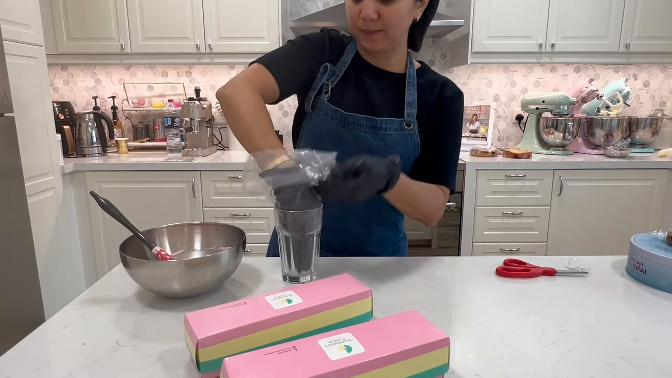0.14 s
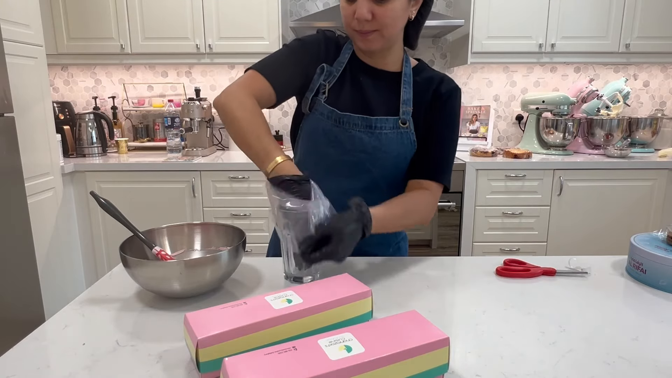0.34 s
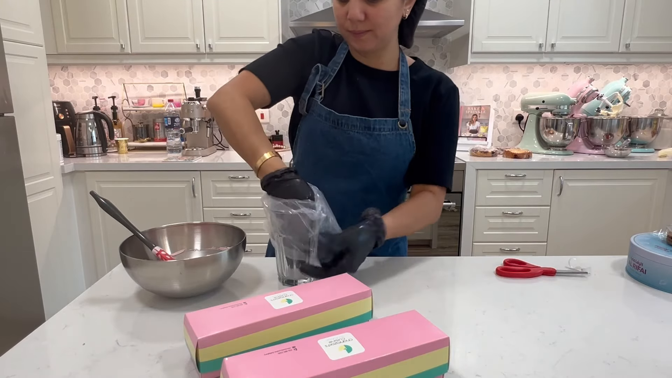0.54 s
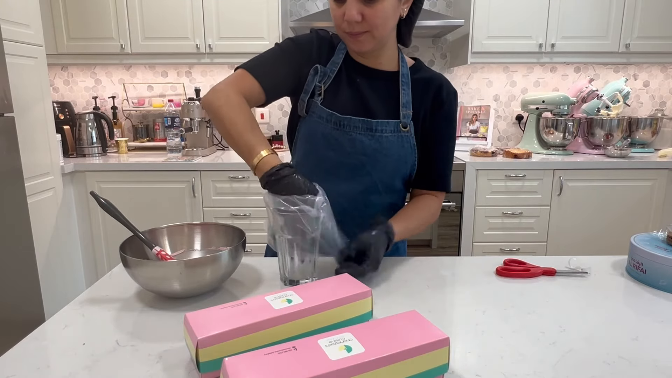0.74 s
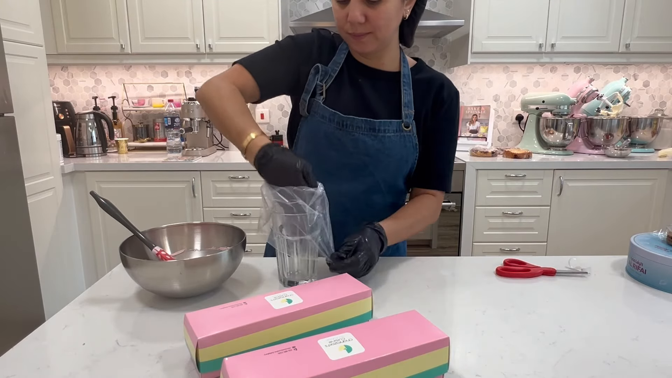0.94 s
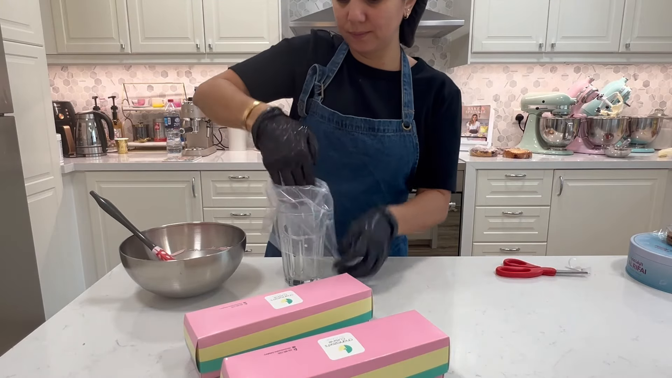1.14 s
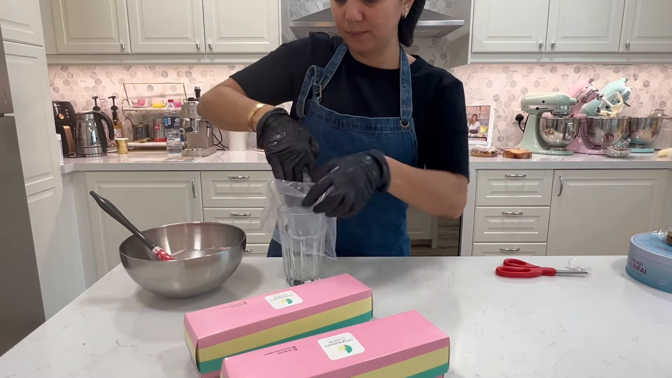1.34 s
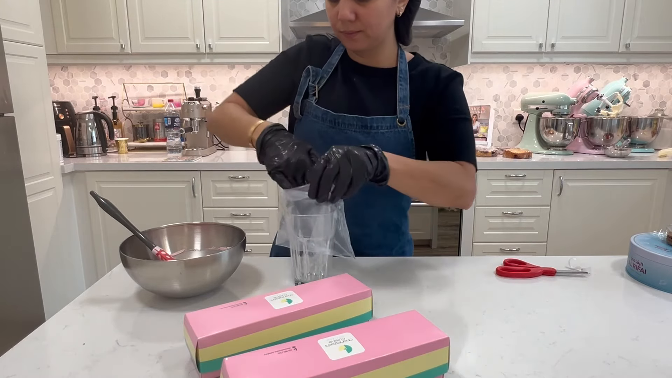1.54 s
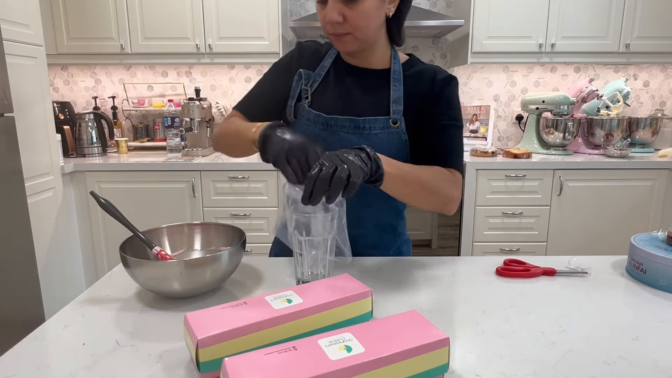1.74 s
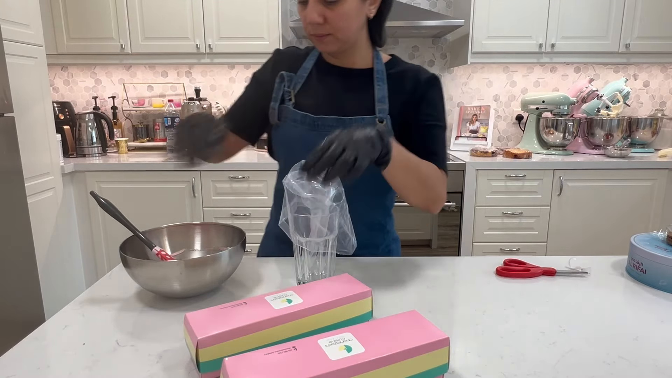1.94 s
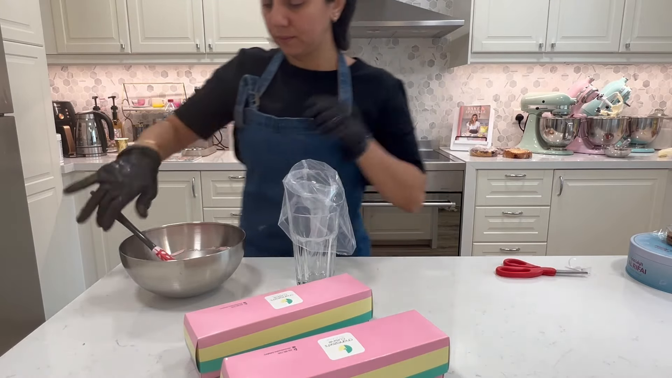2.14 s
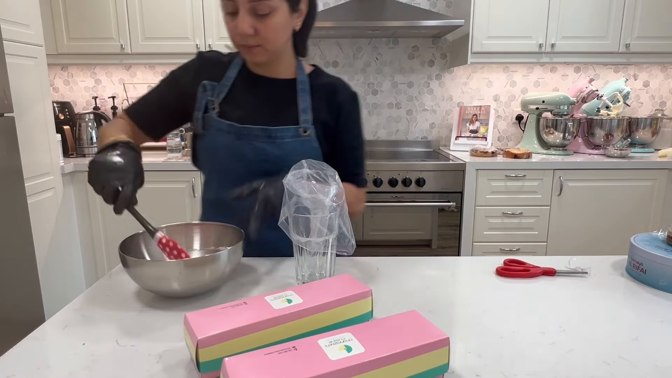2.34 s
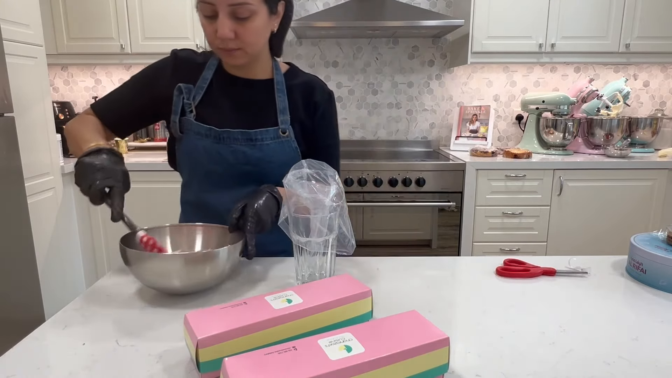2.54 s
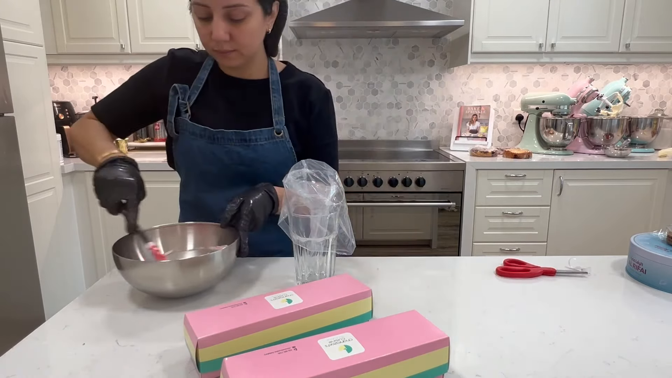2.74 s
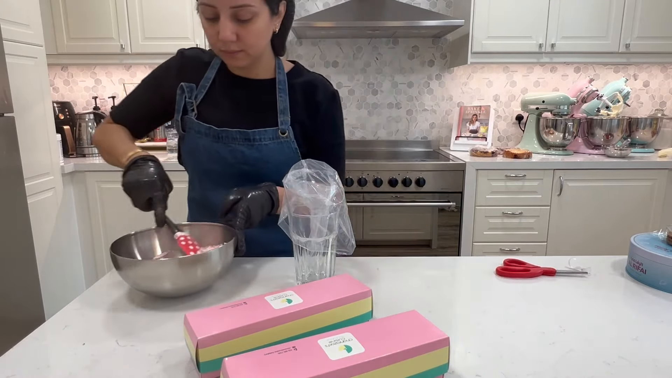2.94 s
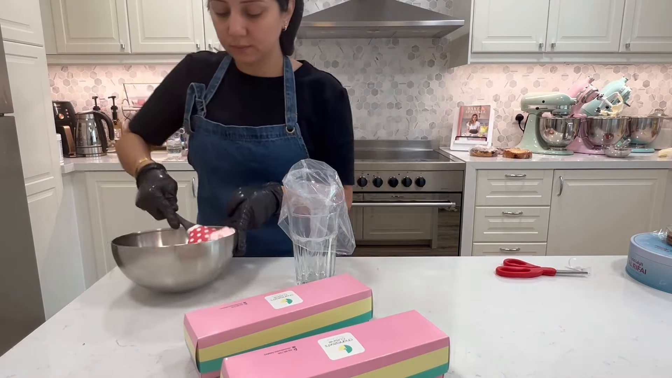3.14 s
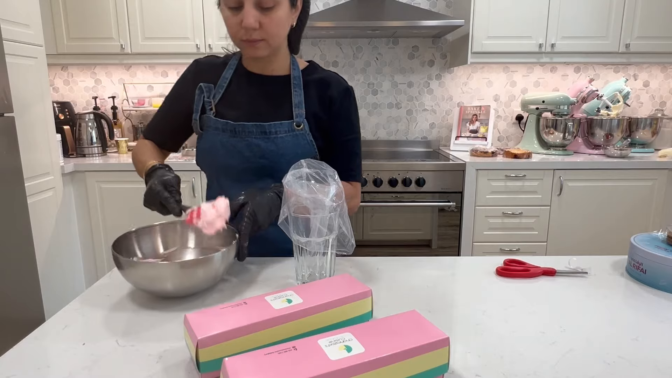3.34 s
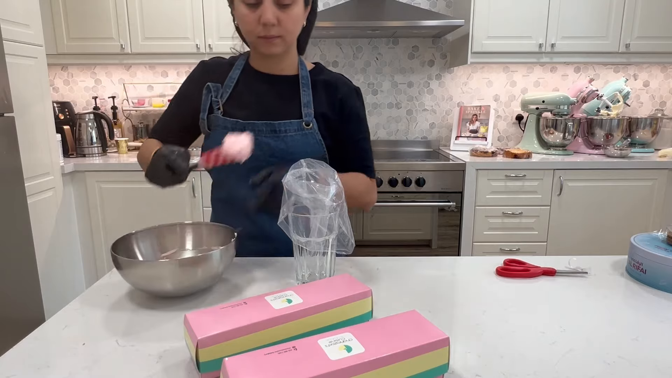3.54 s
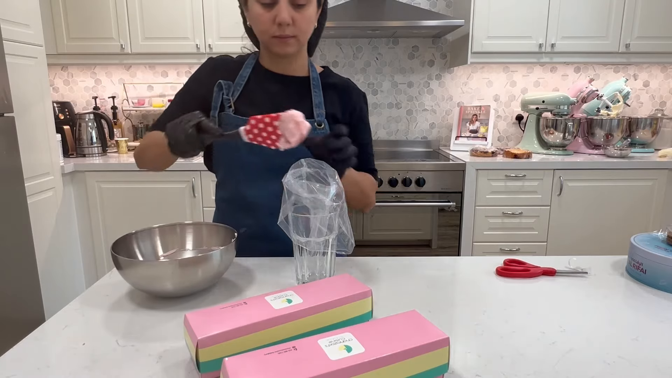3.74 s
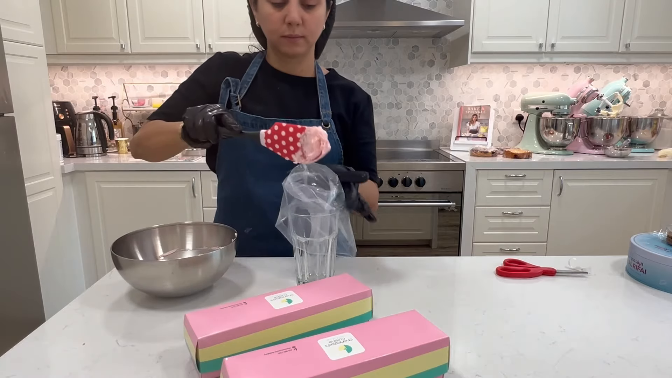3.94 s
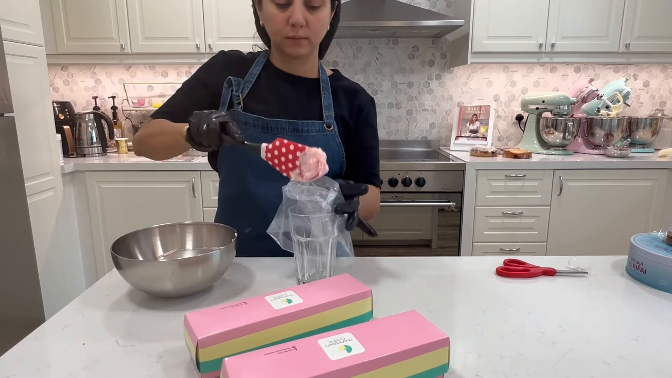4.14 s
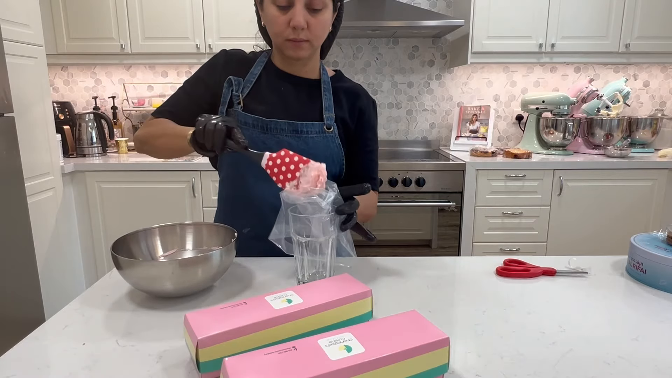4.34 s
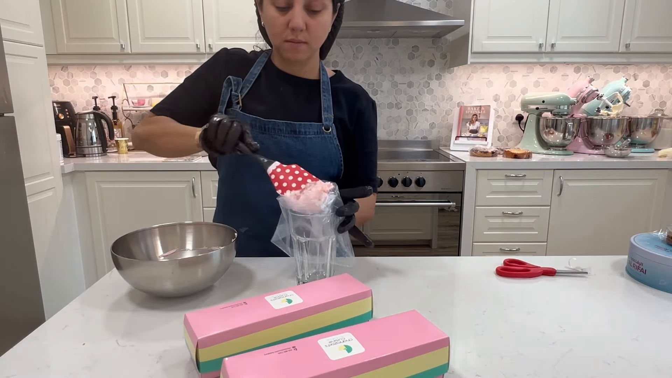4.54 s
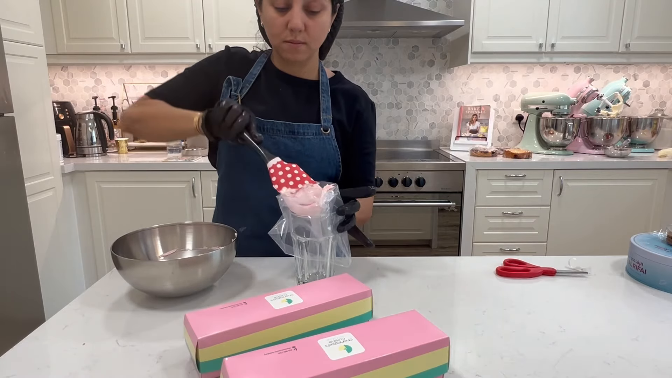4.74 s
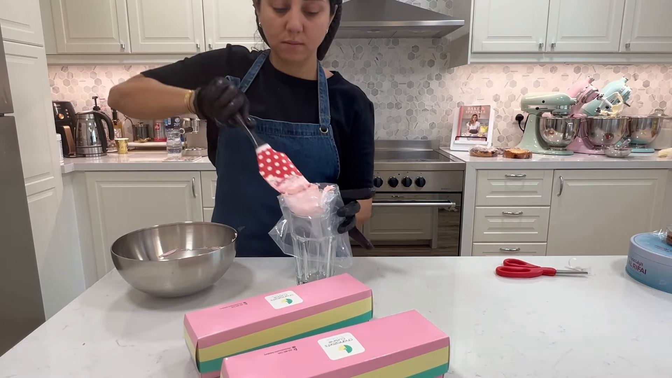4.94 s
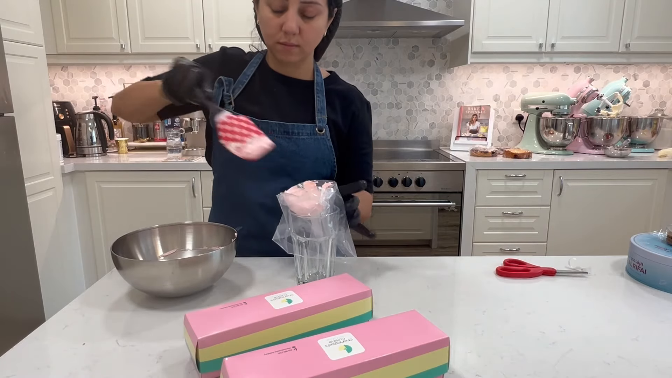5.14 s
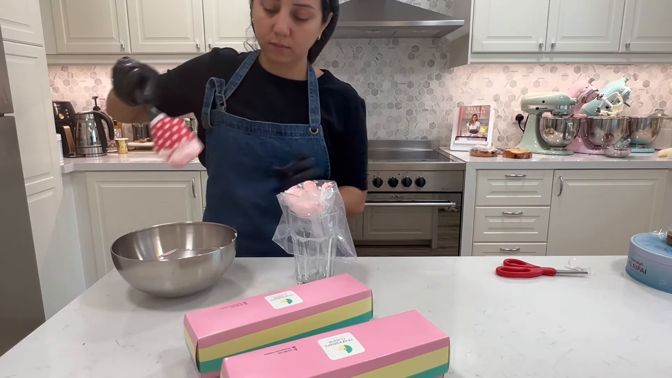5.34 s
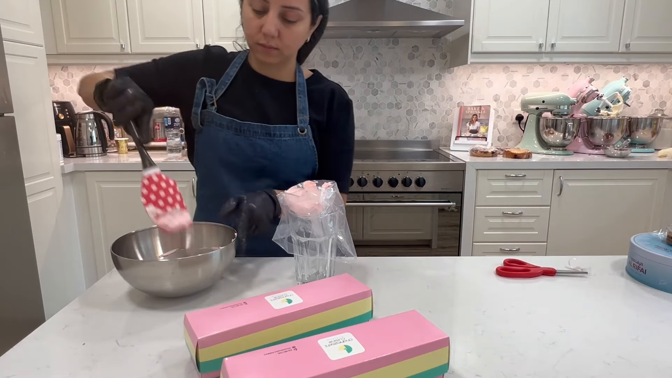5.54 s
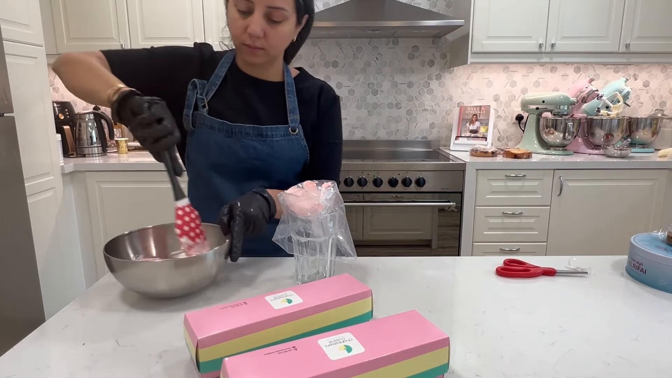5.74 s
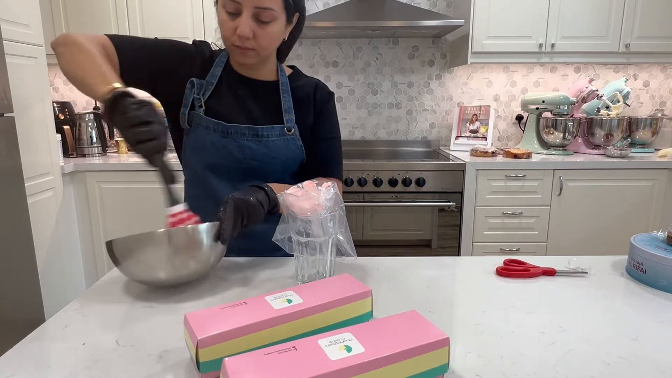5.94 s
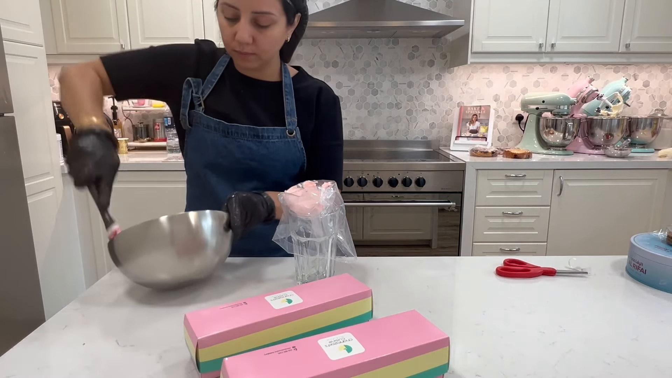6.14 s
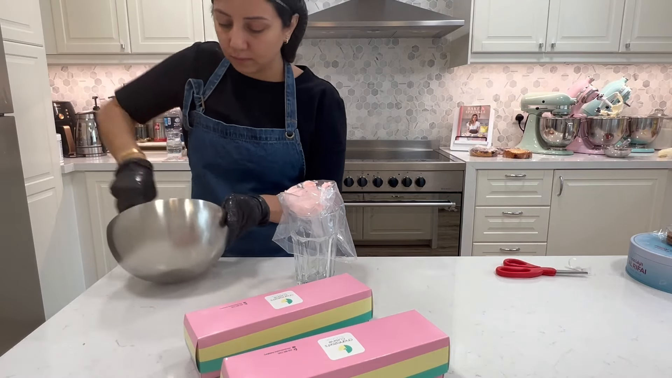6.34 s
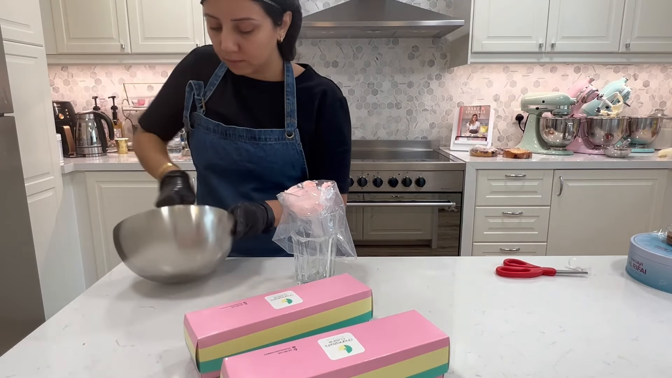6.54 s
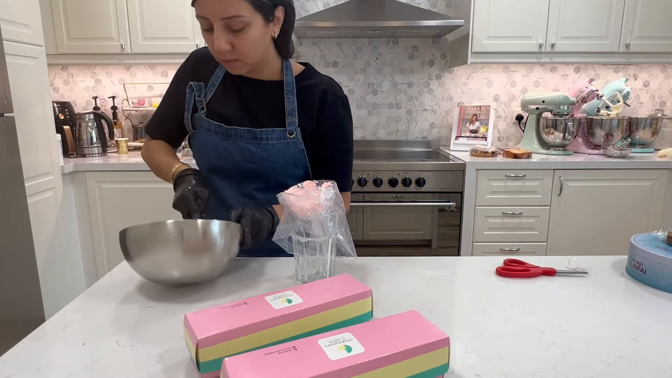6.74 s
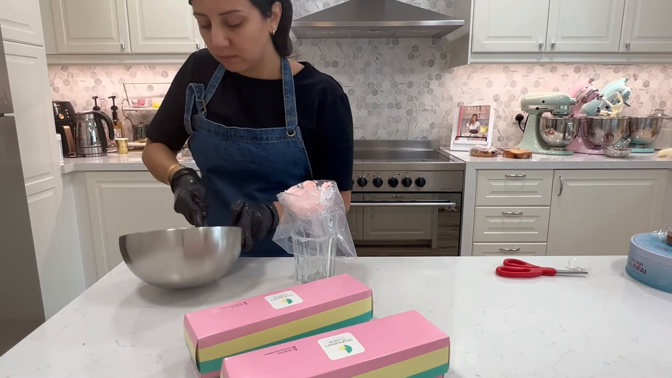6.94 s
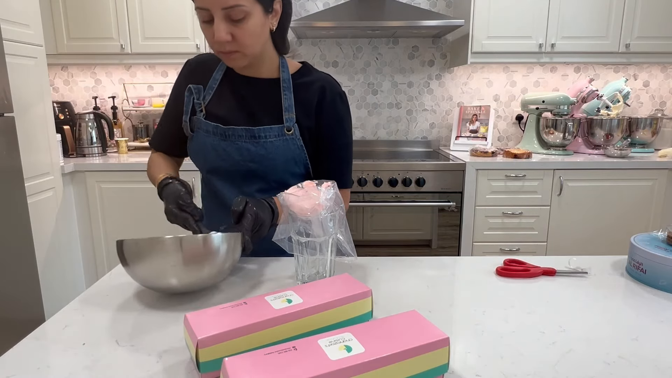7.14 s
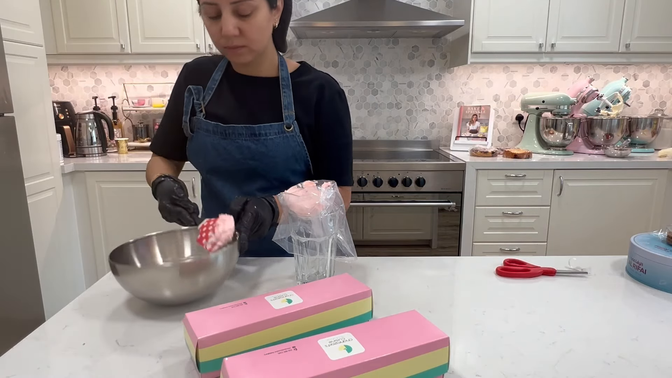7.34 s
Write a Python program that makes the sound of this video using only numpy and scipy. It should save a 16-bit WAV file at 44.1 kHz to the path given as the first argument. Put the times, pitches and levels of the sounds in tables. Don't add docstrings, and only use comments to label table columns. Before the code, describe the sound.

Crinkly plastic film and rattling glass knocks in a humming kitchen, followed by one metallic bowl tap, soft bumps, quieter rustles and faint scraping.

```python
import sys
import numpy as np
from scipy import signal
from scipy.fft import rfft, irfft, next_fast_len
from scipy.io import wavfile
from scipy.ndimage import uniform_filter1d

SR = 44100
rng = np.random.default_rng(int(sys.argv[2]) if len(sys.argv) > 2 else 0)


def elevation(decibels):
    levels = np.asarray(decibels, float)
    return 10 ** (levels / 20)


def generate_wav(signal):
    frames = np.transpose(np.atleast_2d(signal))
    scaled = np.clip(frames, -1, 1) * 32767
    pcm = np.round(scaled).astype(np.int16)
    wavfile.write(sys.argv[1], SR, pcm)


N = 325458

# f/Hz, likeness (1 = same)
LIKENESS = [(60, 0.9), (150, 0.84), (380, 0.2), (950, -0.097), (8000, -0.035)]
# f/Hz, difference/dB
LEFT_RIGHT_TILT = [(60, 0.5), (290, 2), (900, -0.5), (2500, -1), (5300, -8.5), (6800, -6.5), (8200, -2.5)]


def evened(x):
    return x / np.sqrt(np.mean(x ** 2) + 1e-20)


def read(points, hz):
    f, value = np.transpose(points)
    return np.interp(np.log(hz + 1), np.log(f + 1), value)


def add(mix, s, sound):
    part = mix[round(s * SR):][:len(sound)]
    part += sound[:len(part)]


def colour(x, points):
    level_db = read(points, abs(np.fft.fftfreq(4096, 1 / SR)))
    log_gain = np.log(elevation(np.maximum(level_db, -100)))
    taps = np.fft.ifft(np.exp(signal.hilbert(log_gain).conj())).real[:2048]
    return signal.oaconvolve(x, taps)[:len(x)]


def ring(x, hz, width_hz):
    r = np.exp(-np.pi * width_hz / SR)
    turn = 2 * np.pi * hz / SR
    return signal.lfilter([np.sin(turn)], [1, -2 * r * np.cos(turn), r * r], x)


def resonate(x, hz, width_hz):
    turn = np.exp(2j * np.pi * np.cumsum(hz) / SR)
    r = np.exp(-np.pi * width_hz / SR)
    return 2 * (turn * signal.lfilter([1 - r], [1, -r], x / turn)).real


def clicks(count, per_s, spread_db):
    chance, side, size = rng.random((count, 3)).T
    return (chance < per_s / SR) * np.sign(side - .5) * elevation(-spread_db * np.log(size + 0.045))


def gestures(rows):
    swing_db = 30
    peak, db, build, die = (np.array(rows).T[k][:, None] for k in range(4))
    late = np.arange(0, N + 16, 16) / SR - peak
    distance = np.maximum(-late / abs(build), late / abs(die))
    return elevation(2 * np.maximum(db - swing_db * distance, -140))


def spread(control):
    return np.interp(np.arange(N), 16 * np.arange(len(control)), control)


def bag():
    # f/Hz, level/dB per Hz
    film_colour = [(180, -32), (300, -3), (460, 2), (600, -5), (1000, -3.5), (3000, -2), (6200, -9),
                   (9000, -10.5), (12000, -15), (16000, -30)]
    # peak t/s, crackle level/dB, build-up/s, die-away/s, taut patch f/Hz
    tugs = [(0.004, -36.5, 0.022, 0.11, 5500), (0.09, -35.5, 0.34, 0.67, 4000), (0.3, -34.5, 1, 0.5, 4900),
            (0.39, -33.5, 0.37, 0.64, 5450), (0.53, -37, 1, 0.1, 4500), (0.568, -26, 0.01, 0.022, 4000),
            (0.736, -29, 0.12, 0.28, 4670), (0.9, -39.5, 0.12, 0.53, 4000),
            (1.057, -36.5, 0.012, 0.3, 4770), (1.352, -37.5, 0.04, 0.06, 2240),
            (1.422, -36.5, 0.067, 0.18, 4770), (1.506, -28.5, 0.25, 0.033, 4770),
            (1.62, -28.5, 0.093, 0.11, 5300), (3.961, -40.5, 0.0038, 0.04, 3500),
            (4.013, -40.5, 0.099, 0.078, 3500), (4.069, -35, 0.0051, 0.13, 4000),
            (4.344, -39.5, 0.021, 0.14, 5300), (4.512, -38.5, 0.0083, 0.074, 5700),
            (4.607, -48, 0.012, 0.23, 4670), (4.713, -46, 0.005, 0.034, 4200),
            (4.982, -61.5, 0.018, 0.3, 2960), (5.068, -50, 0.012, 0.072, 5660)]
    crisp_db, dull_at_peak, dull_per_db = -34, 0.2, 0.035
    clumps = evened(uniform_filter1d(rng.standard_normal(N // 64 + 1), 8))
    clumps = np.repeat(clumps, 64)[:N]
    wide = clicks(N, 120, 2.9)
    crackle = 0
    for hz in np.geomspace(500, 14000, num=12):
        buckles = clicks(N, 600, 3.85) + 0.23 * wide
        crackle = crackle + evened(ring(buckles, hz, .5 * hz)) * np.sqrt(hz)
    crackle = evened(crackle * elevation(2.5 * clumps))
    bright = evened(colour(crackle, film_colour))
    power = gestures(tugs)
    total = power.sum(0)
    patch_hz = spread(np.array(tugs)[:, -1] @ power / total)
    dull = evened(resonate(crackle, patch_hz, 2440))
    effort_db = spread(10 * np.log10(total))
    share = np.clip(dull_at_peak + dull_per_db * (crisp_db - effort_db), 0, 1)
    return elevation(effort_db - 6.0) * ((1 - share) * bright + share * dull)


def pops():
    # t/s, peak level/dB, f/Hz, tick level/dB
    crease_flips = [(0.0024, -34, 2170, 7), (0.1206, -30.5, 1670, -1), (0.199, -24, 2040, -7.5),
                    (0.2377, -27.5, 2560, -4.5), (0.3602, -24, 2670, -2), (0.434, -35, 3250, 7),
                    (0.5674, -33, 1650, 0), (0.6913, -32, 2020, -22), (0.7152, -29.5, 2000, -2),
                    (0.7301, -25, 2580, -18), (0.7452, -29.5, 2030, 2), (0.7499, -23.5, 3030, -11),
                    (0.757, -34, 2400, -6), (0.895, -28, 1650, -7.5), (1.059, -36, 2600, -0.5),
                    (1.334, -38, 2040, -19), (1.3713, -40, 2440, -9), (1.379, -46, 2650, 3.5),
                    (1.385, -41, 2600, -2), (1.401, -34.5, 2970, -18), (1.412, -35, 2430, -7),
                    (1.4442, -30, 2150, -5), (1.5178, -29, 1610, -2), (3.326, -55.5, 3220, -32),
                    (3.5485, -43, 2580, -13), (3.928, -49, 2600, -24), (3.957, -42, 3140, -23),
                    (3.9822, -45, 2400, -24), (4.0153, -36.5, 1750, -10), (4.057, -49, 3000, 2),
                    (3.999, -46, 2320, -4), (4.067, -25, 2350, -12.5), (4.0898, -32.5, 3130, -6),
                    (4.0895, -47, 2050, -10), (4.097, -36, 1450, -12), (4.206, -37, 2230, -11),
                    (4.243, -41, 2960, -20), (4.342, -33.5, 2850, -11.5), (4.439, -42, 2600, -23),
                    (4.5122, -42, 2270, -8), (4.5984, -44.5, 1690, -10), (4.6, -37.5, 3220, -20),
                    (4.611, -33.5, 2600, -5), (4.619, -40, 2950, -23), (4.712, -34, 2830, -18),
                    (4.978, -54, 2550, -21), (5.003, -51.5, 2530, -33.5), (5.064, -45.5, 2880, -15)]
    out, t = np.zeros(N), np.arange(600) / SR
    for s, db, hz, tick_db in crease_flips:
        noise = rng.standard_normal(len(t))
        cycles = .9 + np.clip(-tick_db / 25 - .3, 0, 1.2)
        shape = t * hz / cycles * np.exp(1 - t * hz / cycles)
        phase_jump = 4.0 * (1 - np.exp(-t * hz / 0.064))
        tock = np.sin(2 * np.pi * hz * t + phase_jump) * shape
        tock = tock + 0.3 * np.sin(2 * np.pi * 1.6 * hz * t) * np.exp(-t / 0.0005)
        tick = evened(ring(noise, 8200, 5500)) * np.exp(-t / 0.00049)
        add(out, s, elevation(db - 1.5) * (tock + elevation(tick_db + 10.0) * tick))
    return out


def tumbler():
    # t/s, peak level/dB, strongest mode f/Hz, chatter length/s, hardness/dB
    knocks = [(0.079, -15, 980, 0.0298, 1), (0.122, -33, 1130, 0.043, 7), (0.213, -15.5, 1080, 0.0274, 0),
              (0.275, -31, 1180, 0.017, 3), (0.428, -28, 624, 0.041, -8), (0.57, -17, 820, 0.024, -0.5),
              (0.632, -36, 1180, 0.019, 5.5), (0.714, -20, 755, 0.023, 3), (0.789, -33, 1190, 0.04, 7),
              (0.845, -14, 730, 0.035, 0.5), (1.036, -12, 780, 0.029, 1), (1.082, -21, 767, 0.011, 19),
              (1.17, -33, 1320, 0.022, 4), (1.368, -32.5, 535, 0.086, -4.5), (1.444, -9.5, 603, 0.033, -2),
              (1.478, -6.5, 1120, 0.027, 2.5), (1.513, -12, 950, 0.027, -4), (1.617, -3.5, 750, 0.026, 2.5),
              (1.655, -18.5, 1120, 0.033, -0.5)]
    # f/Hz, width/Hz, level/dB
    glass_modes = [(182, 51, -2), (259, 65, -8.5), (518, 10, 1.5), (655, 52, 1), (756, 67, 6),
                   (964, 28, 4.5), (1120, 29, 6.5), (1285, 91, 5), (1685, 120, 4), (1750, 590, 6),
                   (2120, 73, -6.5), (2600, 190, -1), (2950, 370, -8), (2600, 4800, -11)]
    out, t = np.zeros((2, N)), np.arange(4400) / SR
    for k, (s, db, lead_hz, length, hard_db) in enumerate(knocks):
        contact = np.clip(t / 0.00046, 0, 1) * (1 + 0.65 * np.exp(-t / 0.012))
        contact = contact * np.clip((length - t) / 0.0032, 0, 1)
        sound = 0
        for hz, width, mode_db in glass_modes:
            force = clicks(len(t), 2500, 0.68) * contact
            favour_db = 6 * np.exp(-(np.log(hz / lead_hz) / 0.18) ** 2) + hard_db * np.log2(hz / 1000)
            detuned_hz = hz * rng.normal(1, 0.0048)
            mode = evened(ring(ring(force, hz, 0.71 * hz), detuned_hz, width))
            sound = sound + elevation(mode_db + favour_db) * mode
        rim = elevation(-20) * evened(ring(force, 6220, 60)) + elevation(-26) * evened(ring(force, 4500, 2500))
        sound = sound + elevation(hard_db) * rim
        loudness = np.sqrt(np.mean(sound[:round(length * SR)] ** 2))
        add(out[k % 2], s, elevation(db - 16.0) * sound / loudness)
    return out


def nudges():
    # t/s, peak level/dB, f/Hz, ring width/Hz
    soft_pushes = [(3.893, -46, 654, 150), (3.957, -41, 894, 150), (3.96, -45, 560, 150),
                   (4.017, -34, 700, 200), (4.066, -36, 482, 150), (4.068, -36, 950, 200),
                   (4.095, -41, 700, 300), (4.172, -35, 450, 200), (4.213, -36, 520, 202),
                   (4.311, -41, 2000, 130), (4.336, -39, 2020, 110), (4.342, -43, 480, 70),
                   (4.343, -48, 783, 150), (4.375, -50, 474, 70), (4.44, -39, 568, 120),
                   (4.441, -32.5, 1050, 250), (4.44, -42, 1890, 200), (4.496, -38, 600, 151),
                   (4.515, -41.5, 535, 60), (4.714, -36, 552, 60)]
    out, t = np.zeros(N), np.arange(3000) / SR
    for s, db, hz, width_hz in soft_pushes:
        shape = np.clip(t / 0.0018, 0, 1) * np.exp(-np.pi * width_hz * t)
        add(out, s, elevation(db) * shape * np.sin(2 * np.pi * hz * t))
    return out


def bowl():
    # t/s, peak level/dB, hardness/dB, shimmer level/dB,
    # tuning as the hand bends the rim (ratio)
    taps = [
        (2.574, -17, -5.5, -58, 1.0),
        (5.87, -50.5, -24.5, -96, 1.04),
        (6.0, -50.5, -18, -74, 1.1),
        (6.459, -45, -12, -75.5, 0.96),
        (6.99, -50.5, -30, -100, 1.05),
    ]
    # f/Hz, width/Hz, level/dB, thin lasting mode level/dB
    steel_modes = [(688, 95, -13.5, 6.5), (1060, 210, -5, -10.5), (1610, 120, -1, -14),
                   (2350, 410, -1.5, -25), (2970, 110, -1.5, -24), (4000, 340, -1.5, -19),
                   (4690, 200, 3, -4), (5600, 260, 2.5, -20), (6600, 190, 2.5, -18), (8950, 1000, 9, -30),
                   (7280, 140, 6, -8), (3340, 190, -5.5, -30), (7750, 320, 3, -25), (3500, 12200, 3.5, -40)]
    out, t = np.zeros(N), np.arange(SR // 2) / SR
    soften = signal.butter(8, 10900, fs=SR, output="sos")
    for s, db, hard_db, shimmer_db, tuning in taps:
        blow = signal.sosfilt(soften, t == 0)
        modes = 0
        for hz, width, mode_db, thin_db in steel_modes:
            struck = np.roll(blow, rng.integers(0, 45))
            hz = hz * tuning
            thin = sum(ring(struck, hz * split, 4) for split in (.988, 1.001, 1.011))
            damped = evened(ring(ring(struck, hz, 3 * width), hz, width))
            pair = damped + elevation(thin_db - 9) * evened(thin)
            modes = modes + elevation(mode_db + hard_db * np.log2(hz / 1500)) * pair
        shimmer = ring(ring(rng.standard_normal(len(t)), 7300, 2300), 8200, 2600)
        shimmer = evened(shimmer) * elevation(-60 * t / 1.05)
        add(out, s, elevation(db) * modes / abs(modes).max() + elevation(shimmer_db) * shimmer)
    return out


def slides():
    # f/Hz, level/dB per Hz
    hiss_colour = [(470, -9.5), (800, -6), (2130, -10), (3480, -10), (6500, -12.5), (9000, -19),
                   (12000, -26.5), (16000, -48)]
    # peak t/s, hiss level/dB, build-up/s, die-away/s, singing band f/Hz
    strokes = [(2.0, -61.5, 0.058, 0.38, 5660), (2.25, -61, 0.52, 1.5, 5160),
               (2.564, -51, 0.38, 0.012, 4900), (2.571, -49, 0.0079, 0.004, 5600),
               (3.325, -63, 0.04, 0.15, 5350), (3.39, -65, 0.015, 0.27, 5300),
               (3.547, -47.5, 0.0062, 0.036, 5900), (3.8, -66, 0.98, 0.3, 5600),
               (6.01, -58, 0.13, 0.38, 5970), (6.17, -63.5, 0.45, 0.57, 4970),
               (6.46, -56.5, 0.011, 0.73, 7670), (7.13, -72, 1.1, 0.062, 5670),
               (7.29, -65.5, 0.028, 0.4, 6500)]
    sing_hz, sing_share, sing_per_octave = 5600, 0.28, 0.59
    slips, power = clicks(N, 5000, 0.98), gestures(strokes)
    total = power.sum(0)
    hz = spread(np.array(strokes)[:, -1] @ power / total)
    share = np.clip(sing_share + sing_per_octave * np.log2(hz / sing_hz), 0, 1)
    singing = evened(resonate(resonate(slips, hz, 1600), hz, 1600))
    hiss = evened(colour(slips, hiss_colour))
    return elevation(-9.5) * spread(np.sqrt(total)) * ((1 - share) * hiss + share * singing)


def bumps():
    # t/s, peak level/dB, f/Hz, length/s, counter thump level/dB
    soft_bumps = [(2.698, -31, 219, 0.007, 8), (2.774, -37.5, 704, 0.032, -3),
                  (3.241, -42.5, 318, 0.043, -10), (3.298, -42, 730, 0.056, 0),
                  (3.312, -35.5, 291, 0.022, 2), (3.321, -56, 1770, 0.04, -10),
                  (3.381, -31.5, 506, 0.04, -2), (3.382, -37, 720, 0.0094, -8),
                  (3.387, -45, 1090, 0.012, -10), (3.406, -31.5, 270, 0.019, -9),
                  (3.443, -35.5, 520, 0.032, -4), (3.457, -42, 864, 0.011, -8),
                  (3.46, -50, 1140, 0.012, -10), (3.49, -43, 600, 0.027, -3), (3.505, -37, 500, 0.047, -7),
                  (3.508, -45, 730, 0.011, -8), (3.515, -50, 1156, 0.012, -10),
                  (3.527, -41.5, 272, 0.027, 4), (3.565, -40, 510, 0.035, -10), (3.62, -55, 505, 0.02, -12),
                  (3.667, -61, 730, 0.01, -5), (5.713, -54, 247, 0.049, 3), (5.871, -48, 300, 0.044, -4),
                  (6.005, -42.5, 720, 0.048, -3), (6.461, -38.5, 684, 0.01, -8),
                  (6.462, -42.5, 1510, 0.026, -24), (6.476, -47.5, 2190, 0.022, -20),
                  (6.495, -40.5, 289, 0.025, -6), (6.506, -47, 704, 0.055, -4),
                  (6.465, -50.5, 3100, 0.017, -8), (7.337, -40, 343, 0.13, 2)]
    out, t = np.zeros(N), np.arange(8000) / SR
    for s, db, hz, length, thump_db in soft_bumps:
        push = rng.standard_normal(len(t)) * np.clip(t / 0.0016, 0, 1) * np.clip(1 - t / length, 0, 1)
        thump = evened(ring(push, 232, 110)) + 0.34 * evened(ring(push, 540, 470))
        sound = evened(ring(push, hz, 0.067 * hz)) + elevation(thump_db) * thump
        loudness = np.sqrt(np.mean(sound[:round(length * SR)] ** 2))
        add(out, s, elevation(db - 14.5) * sound / loudness)
    return out


def ports(x, left_late_s, left_db):
    size = next_fast_len(N)
    hz = np.fft.rfftfreq(size, 1 / SR)
    half = elevation((read(LEFT_RIGHT_TILT, hz) + left_db) / 2) * np.exp(-1j * np.pi * hz * left_late_s)
    return irfft(rfft(x, size) * np.array([half, 1 / half]), size)[:, :N]


def kitchen(x):
    # f/Hz, t60/s
    echo_time = [(150, 0.92), (500, 0.43), (1500, 0.71), (4000, 0.65), (9000, 0.42), (11000, 0.26),
                 (16000, 0.041)]
    taps = np.zeros((2, SR))
    grid = np.arange(180, SR - 20, 20)
    at = grid + rng.integers(0, 20, (2, len(grid)))
    np.put_along_axis(taps, at, rng.choice([-1., 1.], at.shape), 1)
    hz, t, z = signal.stft(taps, SR, nperseg=256)
    same = np.clip(read(LIKENESS, hz), -1, 1)[:, None]
    z[1] = same * z[0] + np.sqrt(1 - same ** 2) * z[1]
    z *= elevation(-60 * t / read(echo_time, hz)[:, None])
    z *= elevation([[[.5]], [[-.5]]] * read(LEFT_RIGHT_TILT, hz)[:, None])
    tail = signal.istft(z, SR, nperseg=256)[1]
    return signal.fftconvolve(x[None], tail / np.linalg.norm(tail[0]), axes=1)[:, :N]


def drones():
    # f/Hz, wander/Hz, level/dB
    motors = [(43.7, 5.72, -53.5), (49.6, 5.19, -59.5), (138, 6.94, -52.5), (180.4, 9.5, -64),
              (238.6, 8.01, -62)]
    t, out = np.arange(N) / SR, 0
    for hz, wander_hz, db in motors:
        slow = uniform_filter1d(rng.standard_normal((2, N // 441 + 2)), 5)
        drift, swell = (np.interp(t, np.arange(len(v)) / 100, evened(v)) for v in slow)
        tone = np.sin(2 * np.pi * np.cumsum(hz + wander_hz * drift) / SR)
        out = out + elevation(db + 2.5 + 3.46 * swell) * tone
    return out


def hum():
    # f/Hz, level/dB per Hz
    air_colour = [(24, -27), (36, -3), (70, -6), (140, -2), (200, -13.5), (285, -8), (388, -15),
                  (750, -18.5), (1960, -28.5), (2910, -39), (7310, -42), (9500, -51.5), (12100, -53),
                  (16000, -57)]
    hum_db = -47
    frames, hz = N // 512 + 5, np.fft.rfftfreq(2048, 1 / SR)
    a, b, c, d, patches = rng.standard_normal((frames, 1025, 5)).T
    patches = evened(uniform_filter1d(uniform_filter1d(patches, 14, 0), 6, 1))
    same = np.clip(read(LIKENESS, hz), -1, 1)[:, None]
    left = a + 1j * b
    right = same * left + np.sqrt(1 - same ** 2) * (c + 1j * d)
    z = np.array([left, right])
    tilt_db = [[[.5]], [[-.5]]] * read(LEFT_RIGHT_TILT, hz)[:, None]
    z *= elevation(read(air_colour, hz)[:, None] + 0.98 * patches + tilt_db)
    air = signal.istft(z, nperseg=2048, noverlap=1536)[1][:, :N]
    return elevation(hum_db - 1.5) * evened(air)


def scene():
    # f/Hz, level/dB
    microphone = [(20, -53), (60, -15), (150, -1.5), (250, 2.5), (15700, 2.5), (16300, -30), (16700, -62),
                  (17500, -91)]
    film, snaps, tocks = bag(), pops(), nudges()
    glass = tumbler()
    steel, soft = bowl() + slides(), bumps()
    direct = ports(film + snaps + tocks, .00003, 2.8)
    direct = direct + ports(glass.sum(0), .0001, -0.23)
    direct = direct + ports(steel + soft, -0.0001, 4.3)
    echoes = elevation(-1.0) * kitchen(film + elevation(0.5) * snaps + elevation(0.5) * tocks)
    echoes = echoes + elevation(3.5) * kitchen(steel + elevation(-4.0) * soft)
    echoes = echoes + elevation(-0.24) * sum(kitchen(spot) for spot in glass)
    near = np.array([colour(side, microphone) for side in elevation(3.5) * direct + echoes])
    rumble_cut = signal.butter(4, 36, "high", fs=SR, output="sos")
    return near + signal.sosfilt(rumble_cut, hum() + drones())


def band_limit(x):
    return signal.sosfilt(signal.butter(12, 16480, fs=SR, output="sos"), x)


def record(dry):
    shared_hz, shared_lag_s = 8400, .00029
    size = next_fast_len(N)
    hz, z = np.fft.rfftfreq(size, 1 / SR), rfft(dry, size)
    shared = np.clip((hz - shared_hz) / 600 + .5, 0, .98)
    late_left = z[0] * np.exp(-2j * np.pi * hz * shared_lag_s)
    z[1] = np.sqrt(1 - shared ** 2) * z[1] - shared * late_left
    x = irfft(z, size)[:, :N]
    power_db = 10 * np.log10(abs(uniform_filter1d((x ** 2).mean(0), 800)) + 1e-12)
    fall = np.arange(N) * 3.8 / SR
    held_db = np.maximum.accumulate(power_db + fall) - fall
    over_db = np.maximum(held_db + 17.0, 0)
    return band_limit(x / elevation(0.25 * uniform_filter1d(over_db, 400)))


dry = scene()
out = record(dry)
generate_wav(out)
```